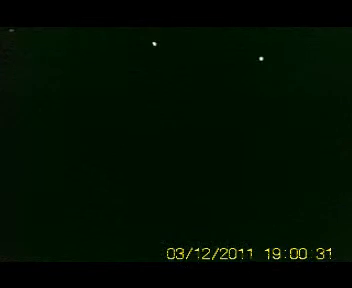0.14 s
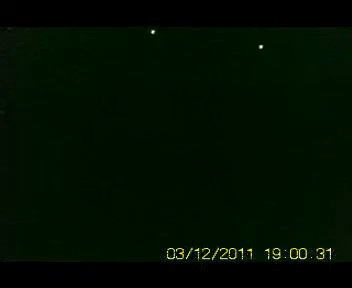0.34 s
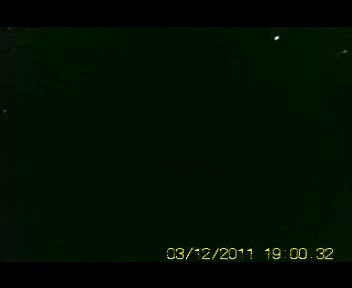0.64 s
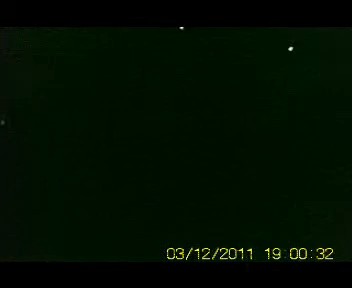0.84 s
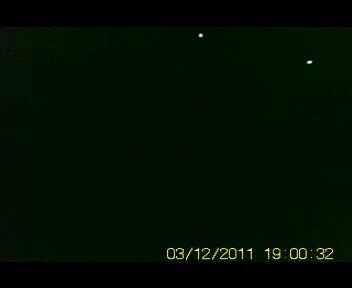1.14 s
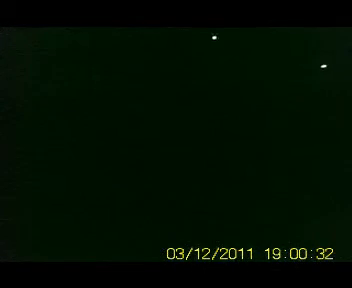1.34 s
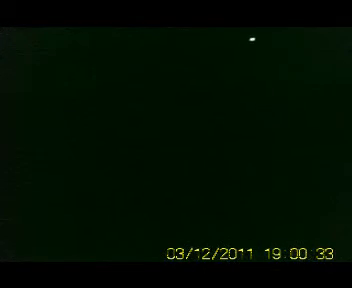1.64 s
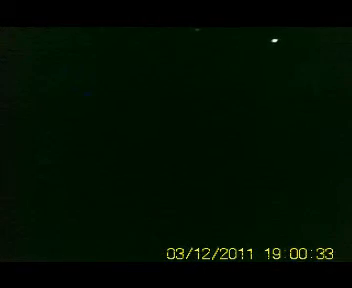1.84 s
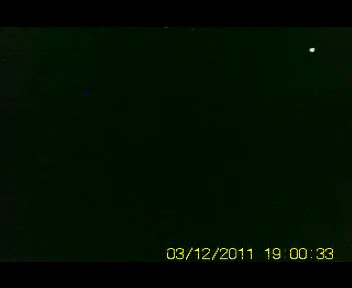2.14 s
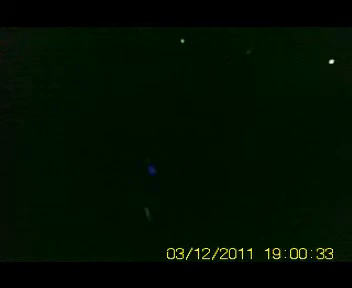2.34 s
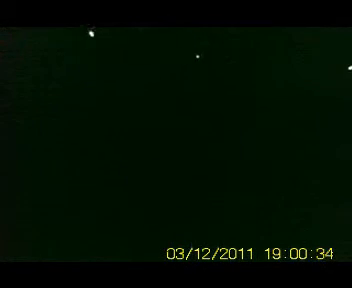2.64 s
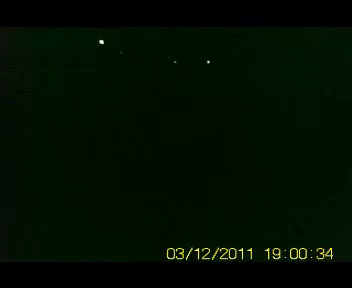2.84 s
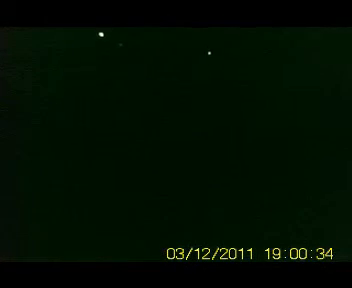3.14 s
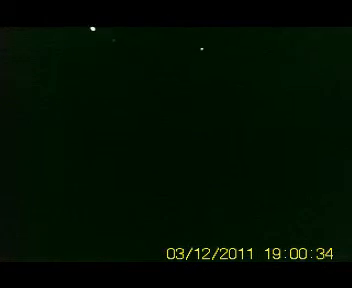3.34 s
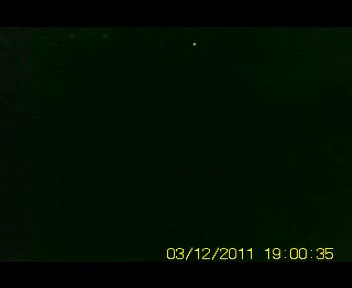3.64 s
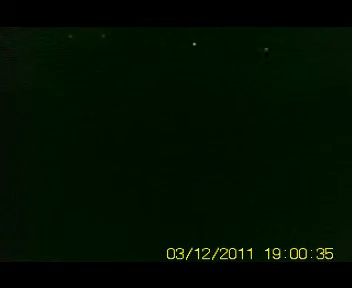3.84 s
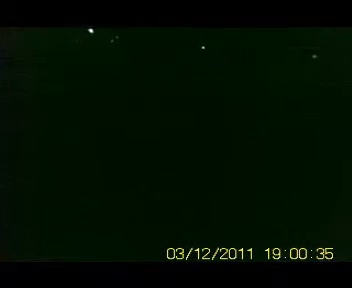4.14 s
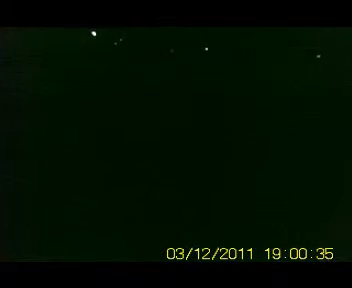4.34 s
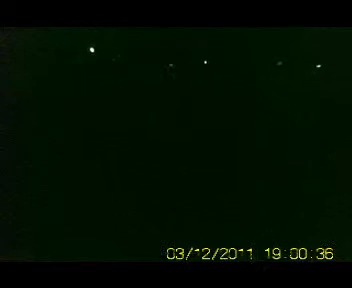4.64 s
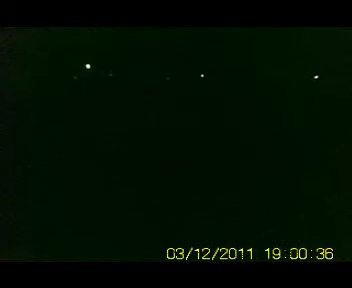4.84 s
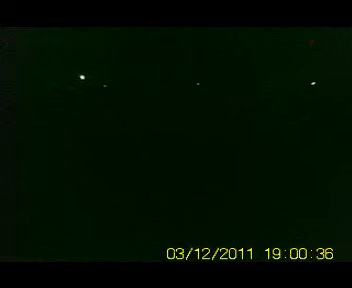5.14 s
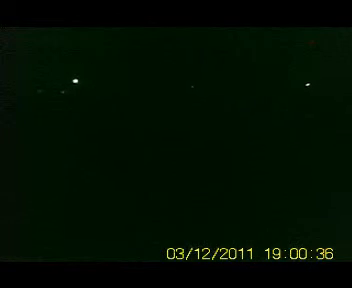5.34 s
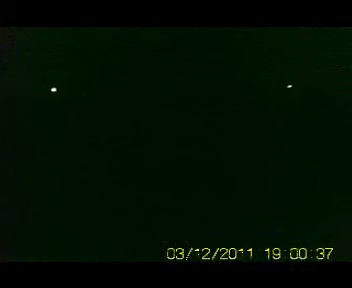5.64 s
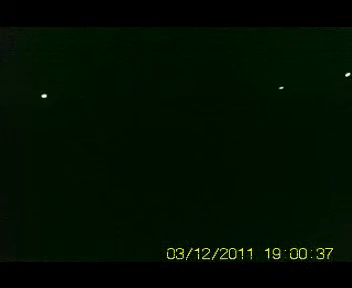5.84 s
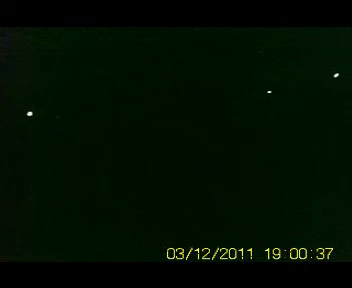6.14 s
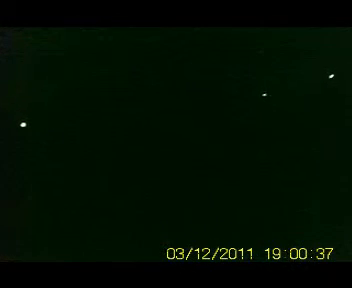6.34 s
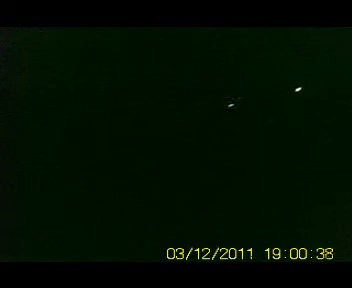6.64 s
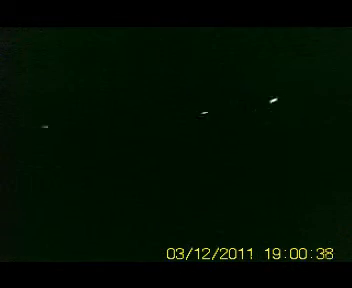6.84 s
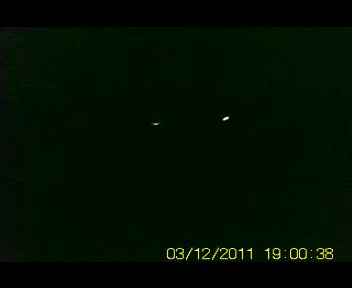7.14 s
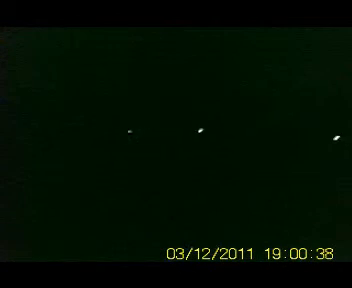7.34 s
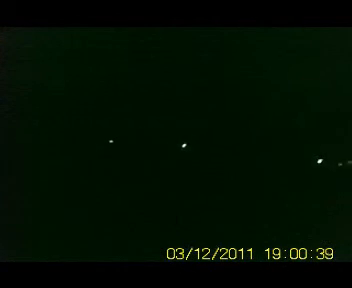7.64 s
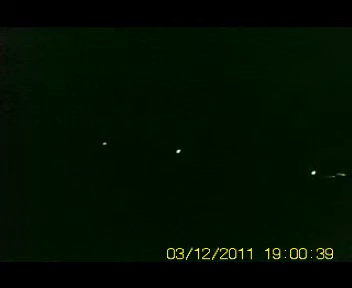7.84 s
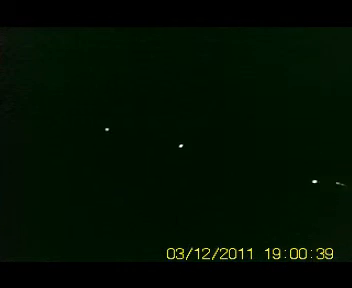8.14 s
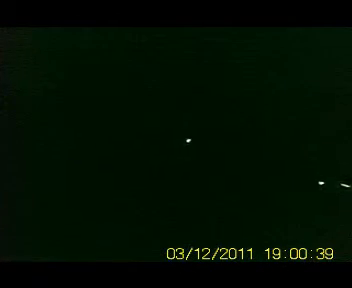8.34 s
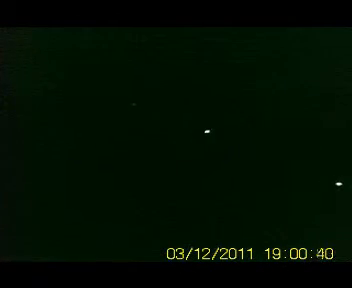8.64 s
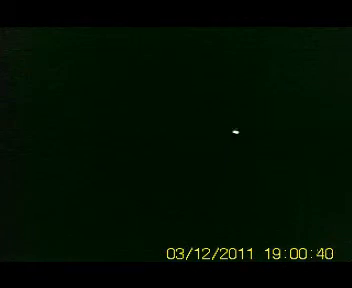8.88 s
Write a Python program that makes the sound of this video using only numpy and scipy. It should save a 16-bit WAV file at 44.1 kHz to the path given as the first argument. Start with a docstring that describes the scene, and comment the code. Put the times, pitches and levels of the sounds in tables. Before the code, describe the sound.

A small microphone mounted on an electric model aircraft in flight, very close and dry. At first there is a muffled low motor hum near 106 hertz, breathy airflow with a hollow howl, and lumpy wind thumps at about 0.3 and 0.8 seconds. From 0.7 seconds the pitch climbs smoothly, with a thin high motor whine peaking near 1.4. At about 1.9 seconds a loose part starts knocking: dull at first, then sharp, dense, irregular cracks, loud enough to distort, with a swelling rush of air around 2.5. The pitch pauses near 145 hertz around 3. At 3.5 seconds the whole level suddenly drops; a few last knocks follow until 3.9. The hum rises to about 162 hertz by 4.6, then holds as a strong steady drone with a buzzing once-per-turn rattle, soft roar and faint thin whine until cut off at 9.

```python
"""Aboard an electric model aircraft

Heard in flight from a small camera microphone fixed to the airframe, as the motor speeds up and holds.
Propeller tones are cosines at shaft orders; wind rumble and slipstream roar are coloured noise, plus a howl.
A loose part trembles, then knocks once a turn: force pulses ring the casing, with hard blows at first.
A thin controller whine lies beneath, and the whole level falls suddenly at about 3.5 s."""
import sys
import numpy as np
from scipy import signal
from scipy.fft import rfft, irfft, next_fast_len
from scipy.io import wavfile
from scipy.ndimage import uniform_filter1d

SR = 44100
rng = np.random.default_rng(int(sys.argv[2]) if len(sys.argv) > 2 else 0)


def unload_wav(signal):
    """Save mono or channel-first audio to the path in sys.argv[1] as 16-bit WAV at rate SR, clipped to [-1, 1]."""
    wavfile.write(
        sys.argv[1],
        SR,
        np.round(np.clip(np.atleast_2d(signal).T, -1, 1) * 32767).astype(np.int16),
    )


N = 397341
TIME = np.arange(N) / SR

# The motor run. Each row: time in seconds, shaft speed in turns per second (Hz),
# levels of orders 1 and 2 in dB before the level fall.
MOTOR = [(0, 105.8, -37, -35), (0.3, 106.2, -34, -30.5), (0.65, 108.2, -33.5, -33.5),
         (1.1, 114.9, -26.5, -31), (1.25, 117.5, -22, -28.5), (1.6, 123.3, -17.5, -28),
         (2, 129.2, -18.5, -30.5), (2.25, 133.2, -24, -29), (2.5, 137.6, -20, -30),
         (2.7, 142.2, -15, -25.5), (2.9, 145, -14, -26), (3.52, 145.2, -14, -24.5), (3.75, 147.5, -13, -24),
         (4.2, 157.1, -9.5, -21.5), (4.6, 162, -6.5, -21), (5.2, 162.6, -5, -20), (6.4, 162.2, -4.5, -21),
         (7, 162.4, -6, -18), (7.7, 161.6, -5.5, -19.5), (9.01, 161.4, -5, -20.5)]
# Upper propeller tones. Each row: order in cycles per turn, level in dB against order 3.
UPPER_ORDERS = [(4, -7.5), (5, -7.5), (6, -11.5)]
# Which magnet tones sound. Each row: order in cycles per turn, dB added to the magnet level.
MAGNET_ORDERS = [(12, -3), (14, -3)]
# Thin magnet tones of the motor speeding up. Each row: time in seconds, level in dB before the order's share.
MAGNET_LEVEL = [(0, -44), (0.5, -42), (1, -39), (1.4, -36.5), (1.8, -37.5), (2.3, -46)]
# Knocking of the loose part. Each row: time in seconds, level in dB before the level fall.
RATTLE = [(1.87, -26), (2.15, -29.5), (2.5, -21.5), (3.05, -22.5), (3.3, -22), (4.5, -20.5), (5.1, -19.5),
          (6.2, -18.5), (8.2, -21.5), (9.01, -22)]
# Hard blows of the loose part. Each row: time in seconds, peak in dB before the level fall, sharpness 0-1.
BLOWS = [(1.8763, -5, 0), (1.884, -11, 0.07), (1.892, -7, 0.1), (1.8998, -6, 0), (1.9081, -3, 0),
         (1.9233, 1, 0), (1.948, -5.5, 0.1), (1.971, -2.5, 0), (1.986, -7, 0.2), (1.9942, -1.5, 0),
         (2.023, -2, 0.1), (2.0398, -5, 0.1), (2.0479, 5, 0.7), (2.0631, -7, 0.46), (2.0712, 11.5, 0.94),
         (2.088, 2, 0.5), (2.1081, 1.5, 0.44), (2.1334, 3, 0.64), (2.1536, 0.5, 0.14), (2.1687, 1.5, 0.25),
         (2.2, 2.5, 0.6), (2.2247, -2, 0.2), (2.2367, 0, 0.04), (2.2527, -1, 0.7), (2.2824, -3, 0),
         (2.2967, -3, 0.1), (2.312, 1, 0.56), (2.3422, 0, 0.64), (2.359, 3.5, 0.7), (2.3799, 5, 0.66),
         (2.4028, 4, 0.94), (2.4303, 3, 0.63), (2.4474, 1, 0.88), (2.4625, 6, 0.53), (2.4845, 6, 0.9),
         (2.4897, 3, 0.87), (2.5062, -1, 0.66), (2.5194, 2, 0.83), (2.5405, 3, 0.6), (2.5562, 2, 0.75),
         (2.5716, 5, 0.64), (2.5993, -1, 0.56), (2.643, 5, 0.85), (2.6624, 3, 0.6), (2.677, 7.5, 0.6),
         (2.7328, -1, 0.6), (2.7688, 1, 0.97), (2.781, 4, 0.87), (2.79, 1, 0.8), (2.8448, 2.5, 0.74),
         (2.8583, 1, 1), (2.8731, 2.5, 0.9), (2.8868, 4, 0.5), (2.8984, 1, 0.87), (2.9275, -1, 0.2),
         (2.9412, 2, 0.64), (2.9746, 1.5, 0.4), (2.99, 3, 0.75), (3.01, 3, 0.72), (3.0244, 1, 0.5),
         (3.045, -2, 0.5), (3.058, 3, 0.54), (3.0715, 3, 0.75), (3.0923, 3.5, 0.61), (3.1118, 1, 0.4),
         (3.1543, 5.5, 0.85), (3.1697, 5.5, 0.71), (3.1806, -1, 0.15), (3.2034, 0, 0.3), (3.3272, -3, 0.25),
         (3.3396, -1.5, 0.9), (3.3678, -0.5, 0.9), (3.4374, 0.5, 0.88), (3.4508, 4, 0.39),
         (3.4717, -2, 0.2), (3.5071, -8, 0.8), (3.5158, -0.5, 0.74), (3.623, 0, 0.32), (3.8696, -2, 0.2),
         (3.8839, -1, 0)]
# Resonances of the casing. Each row: centre in Hz, width in Hz, relative gain in dB.
CASING = [(1640, 370, 1.5), (2625, 220, 5), (3364, 580, 2), (4245, 530, 6.5), (6210, 440, -9),
          (6480, 150, -1.5), (7380, 700, -3.5), (8560, 330, -5), (9480, 440, -9), (12200, 1100, -16.5)]
# Colour of the slipstream. Each row: frequency in Hz, relative density in dB per Hz.
ROAR = [(40, -2), (100, 8.5), (250, 2.5), (600, -1.5), (1200, -4), (1900, -10), (3200, -15), (4300, -10.5),
        (4900, -15), (5600, -17), (7700, -18.5), (8700, -25), (9600, -21), (12500, -29.5)]
# Air howling over an opening. Each row: time in seconds, centre in Hz,
# level in dB on a scale where the plain roar is at +6.
HOWL = [(0, 1540, -6.5), (1.9, 1760, -7.5), (2.8, 1790, -10), (5, 1910, -5.5), (7, 1852, -8), (8, 1667, -5),
        (9.01, 1640, -5)]
# Colour of the wind on the microphone. Each row: frequency in Hz, relative density in dB per Hz.
RUMBLE = [(8.8, -11), (15, 19), (43, 7), (87, 7.5), (123, -10), (130, -17), (170, -26), (290, -120)]
# Gusts. Each row: centre in seconds, half length in seconds, dB added to the roar, dB added to the rumble.
GUSTS = [(0.03, .06, -0.5, 8), (0.301, 0.11, 0.5, 8.5), (0.797, .12, 1, 6), (1.48, 0.9, 1.5, 3),
         (2.503, 0.36, 7, 5), (3.046, 0.14, 2.5, 3.5), (3.47, 0.13, 3, 6), (3.8, 0.11, 0, 3),
         (4.3, 0.25, -1.5, -1.5), (5.6, 0.66, 0.5, 2), (6.4, .4, 1.5, 2), (7.4, 0.14, 0.5, 1),
         (8.951, .15, 0.5, 1)]

CRUISE_HZ = 162  # shaft turns per second
# Levels in dB at cruise speed, and their change in dB per Hz of shaft speed
THIRD_DB, THIRD_DB_PER_HZ = -8, -0.02  # order 3 against order 2
ROAR_DB, ROAR_DB_PER_HZ = -22, 0.28
RUMBLE_DB, RUMBLE_DB_PER_HZ = -16, 0.35
RATTLE_S, TREMBLE_DB = 1.87, -56  # the part comes loose; its level before that
PLAY_TURNS = 0.13  # spread of the knock time
SEATED_HZ, SEATED_PLAY = 155, 0.5  # above this shaft speed the part runs tighter, with this share of its play
WHINE_HZ, WHINE_DB = 6367, -52
FALL_S, FALL_DB = 3.525, -11  # the whole level drops at once


def gain_of(db):
    """Decibels to amplitude."""
    return 10 ** (np.asarray(db) / 20)


def evened(x):
    """Scales to rms 1."""
    return x / np.sqrt(np.mean(x ** 2) + 1e-20)


def curves(table):
    """Every column of a timed table, interpolated at every sample."""
    seconds, *columns = np.transpose(table)
    return [np.interp(TIME, seconds, column) for column in columns]


def drift(hz):
    """Slow random wander of rms 1: white noise low-passed at hz."""
    lowpass = signal.butter(2, hz, fs=SR, output="sos")
    return evened(signal.sosfilt(lowpass, rng.standard_normal(N)))


def noise(spectrum):
    """Gaussian noise of rms 1, coloured by a spectrum drawn over log frequency."""
    f, db = np.transpose(spectrum)
    size = next_fast_len(N)
    hz = np.fft.rfftfreq(size, 1 / SR)
    colour = gain_of(np.interp(np.log(hz + 1), np.log(f + 1), db))
    return evened(irfft(rfft(rng.standard_normal(size)) * colour, size)[:N])


def resonate(x, hz, width):
    """A resonance of peak gain 1: shifts the curve hz down to zero, smooths, and shifts back."""
    turn = np.exp(2j * np.pi * np.cumsum(hz * np.ones(len(x))) / SR)
    r = np.exp(-np.pi * width / SR)
    smooth = signal.lfilter([1 - r], [1, -r], x / turn)
    return 2 * (turn * smooth).real


def shaft(shaft_hz):
    """Turns of the shaft, in step with the blows: they land just before the trough of the shake."""
    turns = np.cumsum(shaft_hz) / SR
    blow_s = np.transpose(BLOWS)[0]
    angle = 2 * np.pi * (np.interp(blow_s, TIME, turns) - 0.37)
    x, y = uniform_filter1d([np.cos(angle), np.sin(angle)], size=9, axis=1)  # mean over nearby blows
    slip = np.interp(TIME, blow_s, np.unwrap(np.arctan2(y, x)) / (2 * np.pi))
    return turns - uniform_filter1d(slip - np.ceil(slip.max()), size=4001)


def propeller(turns, first_db, second_db, third_db):
    """Shaft orders: a slow push and a quicker fall each turn, shaken by gusts; thin magnet tones above."""
    angle = 2 * np.pi * turns + 0.03 * drift(6.5)
    orders = [(1, first_db, 0), (2, second_db, 1.23), (3, third_db, 0.64)]  # (order, dB, lag in radians)
    orders += [(k, third_db + db, 0) for k, db in UPPER_ORDERS]
    blades = sum(gain_of(db + 0.55 * drift(28)) * np.cos(k * angle - lag + 0.054 * drift(15))
                 for k, db, lag in orders)
    magnet_db = curves(MAGNET_LEVEL)[0]
    magnets = sum(gain_of(magnet_db + db + 1.4 * drift(22)) * np.cos(k * angle) for k, db in MAGNET_ORDERS)
    return np.sqrt(2) * (blades + magnets)


def casing(force):
    """The ring of the casing under a force: parallel resonances of alternating sign."""
    return sum((-1) ** k * gain_of(db) * resonate(force, hz, width)
               for k, (hz, width, db) in enumerate(CASING))


def rattle(turns, shaft_hz, rattle_db):
    """One short knock a turn, just before the trough of the shake; strength comes in runs, timing wavers."""
    late, size, bounce, run = rng.standard_normal((int(turns[-1]) + 2, 4)).T
    run = evened(uniform_filter1d(run, size=5))
    late, size, bounce, run = np.tanh(0.6 * np.array([late, size, bounce, run]))  # the play bounds each
    play = np.where(shaft_hz > SEATED_HZ, SEATED_PLAY, 1)

    k = np.floor(turns + 0.85).astype(int)  # number of the knock
    since = turns + 0.64 - k - PLAY_TURNS * play * late[k]  # turns since this knock
    strength = gain_of(4.7 * play * size[k] + 2.9 * run[k]) * (since > 0)
    blow_turns = k[[round(row[0] * SR) for row in BLOWS]]
    strength[np.isin(k, blow_turns)] = 0  # a hard blow takes the place of the knock

    click = 1.4 * np.sign(bounce[k]) * (since < shaft_hz / SR)  # about one sample long
    scrape = 0.45 * rng.choice([-1., 1.], N) * np.exp(-np.maximum(since, 0) / 0.04)
    # The part trembles on between knocks
    chatter = 0.078 * gain_of(8.9 * bounce[k]) * np.exp(-(turns + 1.23 - k) / 1.1)
    force = strength * (click + scrape) + chatter * rng.standard_normal(N)
    return gain_of(rattle_db + 0.5 * drift(33)) * evened(casing(force))


def blows():
    """Hard contacts: a short knock rings the casing; sharp ones add a wide crack with a brief shudder."""
    out, t = np.zeros(N), np.arange(400) / SR
    wide = signal.butter(2, [1500, 10000], "bandpass", fs=SR, output="sos")
    crack_decay = np.exp(-t / 0.00045) + 0.12 * np.exp(-t / 0.0025)
    grains = rng.standard_normal((len(BLOWS), 2, 400))
    for (start, db, sharp), (knock, burst) in zip(BLOWS, grains):
        push = uniform_filter1d(knock * np.exp(-t / 0.0001), size=4)  # a blunt contact has little treble
        ring = evened(casing(push))
        crack = evened(signal.sosfilt(wide, burst * crack_decay))
        share = np.clip(sharp, 0, 1) ** 1.5
        hit = share * crack + (1 - share) * ring
        out[round(start * SR):][:400] += gain_of(db) * hit / abs(hit).max()
    return out


def slipstream(turns, roar_db):
    """Turbulent roar that dips once a turn as a blade passes, and a broad howl of twice-resonated noise."""
    angle = 2 * np.pi * (turns - 0.125)
    pulse_db = -1.4 * np.cos(angle) - 0.9 * np.cos(2 * angle)
    howl_hz, howl_db = curves(HOWL)
    howl = resonate(resonate(rng.standard_normal(N), howl_hz, 320), howl_hz, 350)
    mix = gain_of(6.0) * noise(ROAR) + gain_of(howl_db) * evened(howl)
    return gain_of(roar_db + pulse_db + 1.32 * drift(49)) * mix


def wind(rumble_db):
    """Lumpy low buffeting on the microphone: low noise with a wandering level."""
    return gain_of(rumble_db + 0.5 * drift(5.8)) * noise(RUMBLE)


def gusts():
    """Bell-shaped swells of the airflow, in dB for roar and rumble."""
    return sum(np.outer(dbs, np.exp(-((TIME - centre) / half) ** 2)) for centre, half, *dbs in GUSTS)


def controller():
    """The thin switching whine of the speed controller: one tone with a wavering phase."""
    return np.sqrt(2) * gain_of(WHINE_DB) * np.cos(2 * np.pi * WHINE_HZ * TIME + 0.35 * drift(13.0))


def port(x):
    """Airborne sound enters by a small port that dips near 9 and 11 kHz."""
    for hz, width, depth in [(9050, 350, 0.65), (11030, 1400, 0.46)]:
        x = x - depth * resonate(x, hz, width)
    return x


def scene():
    """One microphone on the airframe: airborne sound by the port, hard blows past it through the casing."""
    shaft_hz, first_db, second_db = curves(MOTOR)
    turns = shaft(shaft_hz)
    faster = shaft_hz - CRUISE_HZ
    gust_db, buffet_db = gusts()
    third_db = second_db + THIRD_DB + THIRD_DB_PER_HZ * faster
    tones = propeller(turns, first_db, second_db, third_db)
    loose = rattle(turns, shaft_hz, np.where(TIME > RATTLE_S, curves(RATTLE)[0], TREMBLE_DB))
    roar = slipstream(turns, ROAR_DB + ROAR_DB_PER_HZ * faster + gust_db)
    rumble = wind(RUMBLE_DB + RUMBLE_DB_PER_HZ * faster + buffet_db)
    whole = port(tones + loose + roar + rumble + controller()) + blows()
    fallen = np.clip((TIME - FALL_S) / 0.0041 + 0.5, 0, 1)  # 0 to 1 within 4.1 ms
    return (whole * gain_of(FALL_DB * fallen))[None]


def record(dry):
    """Overload at the microphone rounds off the hardest peaks; then a low-pass sets the band limit."""
    rounded = dry / (1 + dry ** 6) ** (1 / 6)
    edge = signal.firwin(511, 12400, window=("kaiser", 9), fs=SR)[None]  # cutoff in Hz
    return signal.oaconvolve(rounded, edge, "same")


dry = scene()
out = record(dry)
unload_wav(out)
```